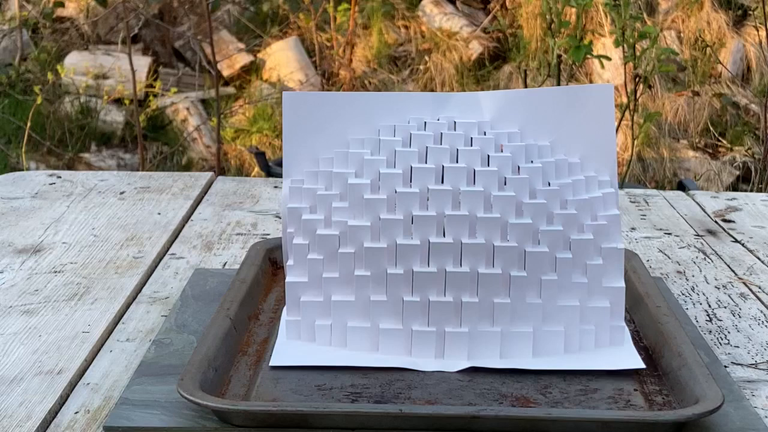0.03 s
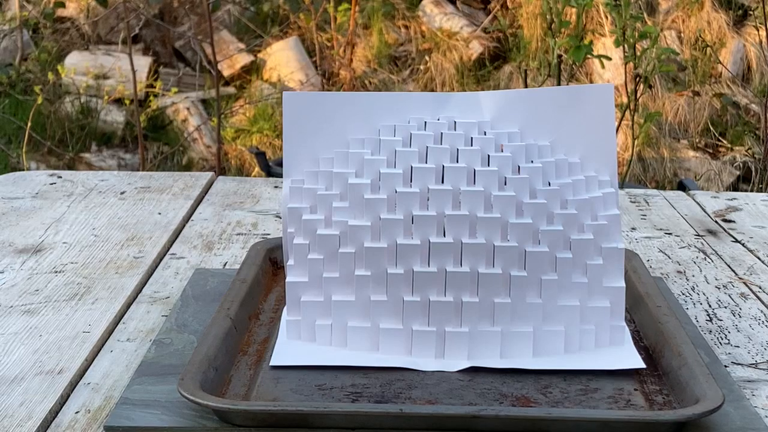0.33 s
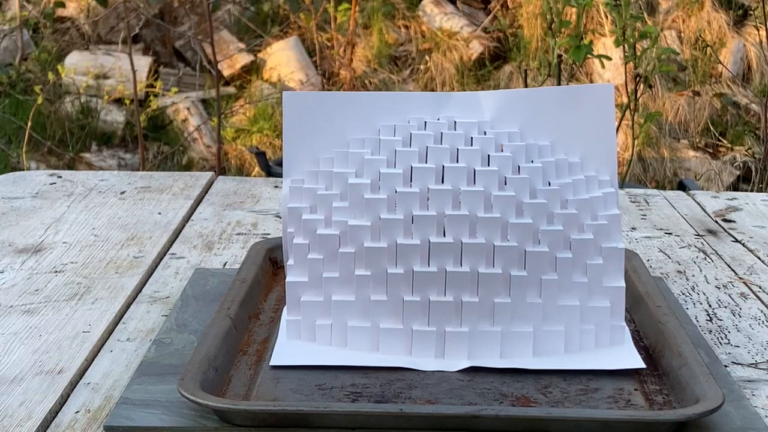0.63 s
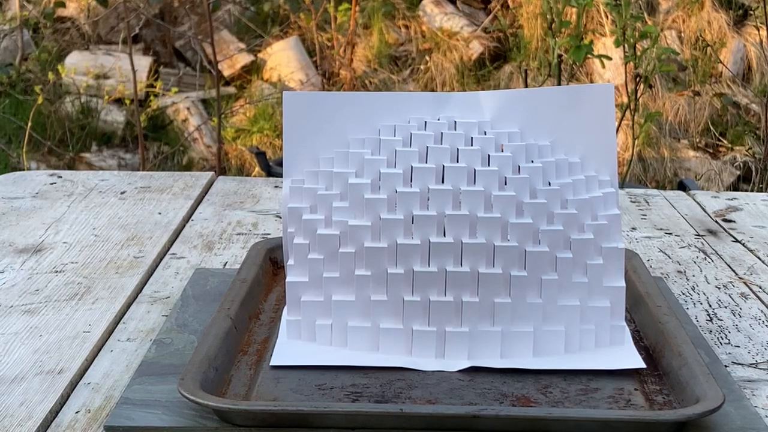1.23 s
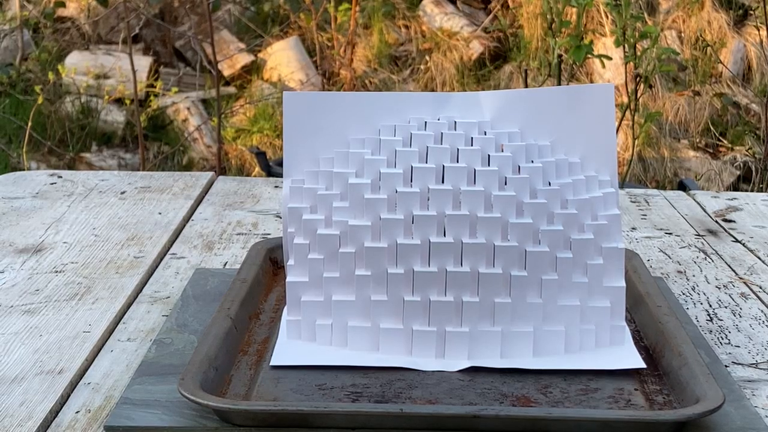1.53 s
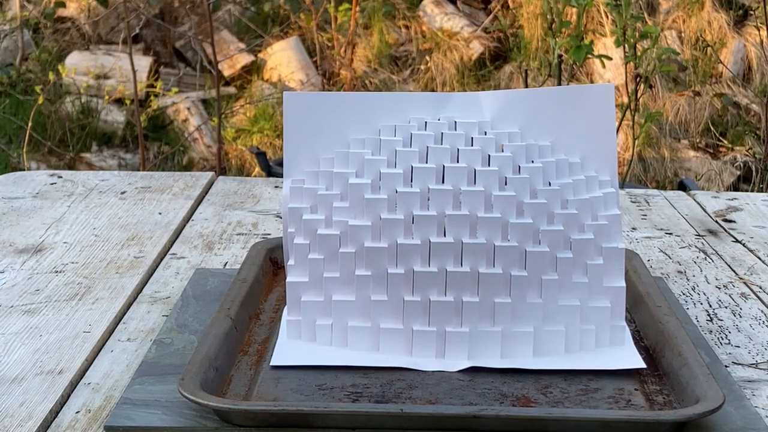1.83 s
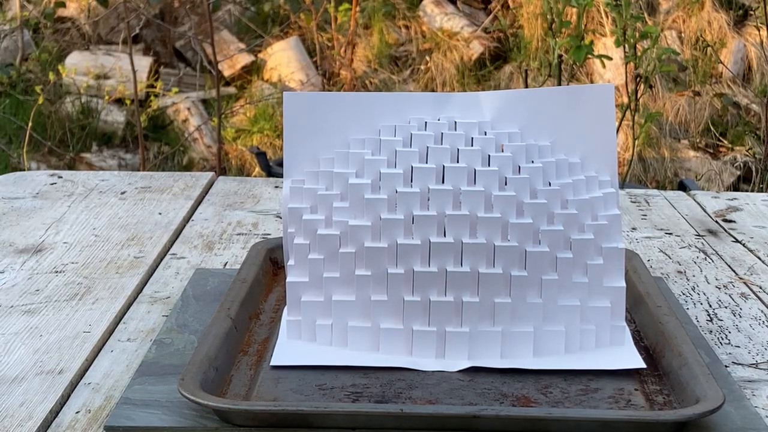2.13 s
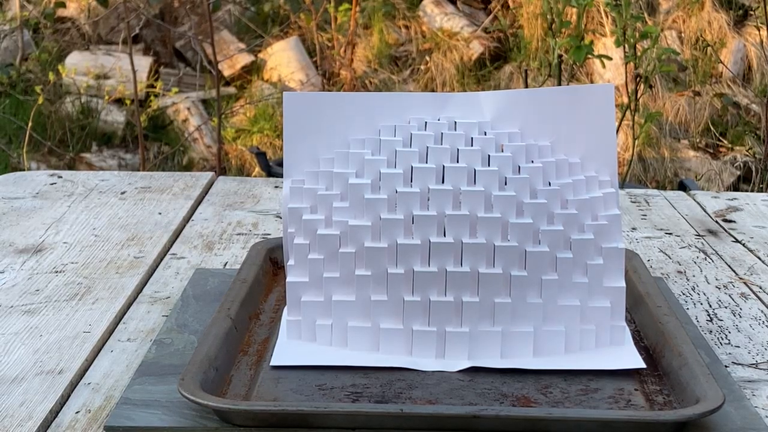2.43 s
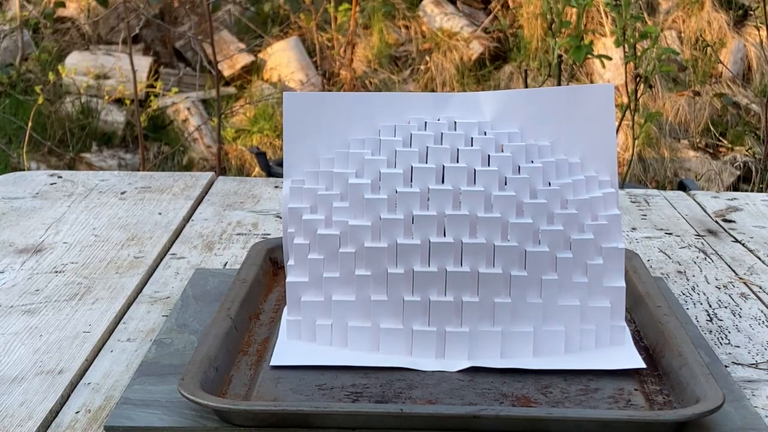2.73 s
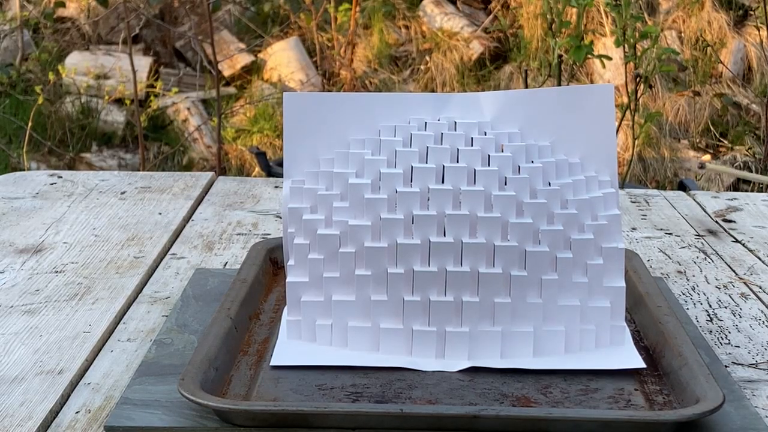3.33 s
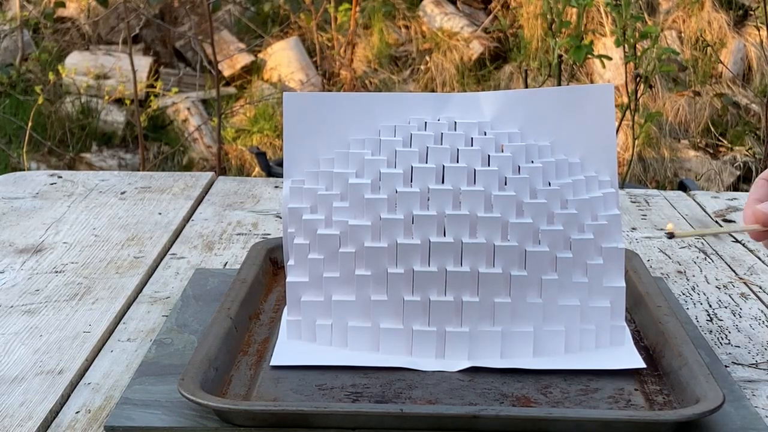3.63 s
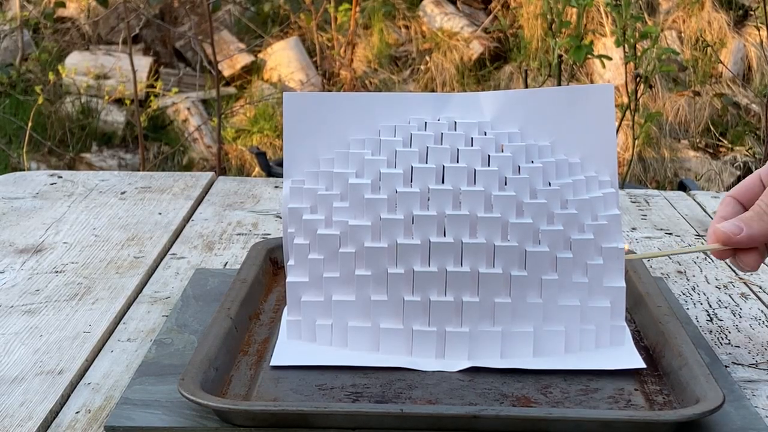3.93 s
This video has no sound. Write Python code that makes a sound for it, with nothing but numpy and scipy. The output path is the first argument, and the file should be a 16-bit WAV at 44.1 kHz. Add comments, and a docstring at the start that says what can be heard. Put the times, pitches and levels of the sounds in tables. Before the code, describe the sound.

A match is struck, then flares with a soft hiss, outdoors with faint birdsong.

```python
"""In a garden, a match is struck near a two-port microphone. Stick-slip friction of the head on the
strip shakes the hollow box; the head sputters, then flares with a soft hiss. Box and matchstick
tick, and the table takes two soft knocks. A small bird sings a long buzzy trill of rapid falling
whistles, others chirp far off, and a distant engine drones under the low rumble of the open air."""
import sys
import numpy as np
from scipy import signal
from scipy.fft import rfft, irfft
from scipy.io import wavfile
from scipy.ndimage import uniform_filter1d

SR = 44100
rng = np.random.default_rng(int(sys.argv[2]) if len(sys.argv) > 2 else 0)


def unload_audio(sound):
    """Save the sound as a 16-bit wav file, at the path given as the first command line argument."""
    columns = np.transpose(np.atleast_2d(sound))
    # keep every value between -1 and 1, then stretch to whole-number steps
    steps = np.round(np.clip(columns, -1, 1) * 32767)
    wavfile.write(sys.argv[1], SR, steps.astype(np.int16))


N = 176400
T, HZ = np.arange(N) / SR, np.fft.rfftfreq(N, 1 / SR)


def amp(db):
    """Decibels to amplitude ratio."""
    return 10 ** (np.asarray(db) / 20)

def unit(x):
    """Normalisation to rms 1."""
    return x / np.sqrt(np.mean(x ** 2) + 1e-20)

def read(points, hz=HZ):
    """Interpolation on a log-frequency axis."""
    f, value = np.transpose(points)
    return np.interp(np.log(hz + 1), np.log(f), value)

def level(points):
    """Amplitude envelope from a dB curve, silent outside it."""
    return amp(np.interp(T, *np.transpose(points), left=-200, right=-200))

def drift(hz):
    """Random modulation: low-passed noise of rms 1."""
    return unit(irfft(rfft(rng.standard_normal(N)) / (1 + (HZ / hz) ** 4), N))

def burst(start, fall, hold=0, rise=1 / SR):
    """Transient envelope: linear attack, hold and exponential decay."""
    return np.clip((T - start) / rise, 0, 1) * np.exp(-np.maximum(T - start - hold, 0) / fall)

def colour(x, points):
    """Minimum-phase filter of unit power gain: the table sets only the spectral shape."""
    gain = amp(read(points, abs(np.fft.fftfreq(4096, 1 / SR))))
    log_response = np.conj(signal.hilbert(np.log(gain)))
    taps = np.fft.ifft(np.exp(log_response)).real[:2048]
    return signal.oaconvolve(x, taps / np.linalg.norm(taps))[:N]

def grains(per_s, spread_db):
    """Shot noise: a dense crackle of tiny clicks of uneven size."""
    size = amp(spread_db * np.minimum(rng.exponential(1, N), 4))
    return unit(size * rng.choice([-1., 1.], N) * (rng.random(N) < per_s / SR))

def echoes(x, t60, delay):
    """Reverberation: sparse, decaying reflections, different on each side."""
    t = T[:SR // 2]
    taps = rng.standard_normal((2, len(t))) * (rng.random((2, len(t))) < .05)
    taps *= amp(-60 * t / t60) * (t > delay)
    taps /= np.linalg.norm(taps, axis=1, keepdims=True)
    return signal.oaconvolve(x[None], taps, axes=1)[:, :N]

def tabletop(x):
    """Early reflections from the table and tray add to the direct sound."""
    return x + amp(-14) * echoes(x, t60=.051, delay=.0026)

def ports(x, balance, lead):
    """Direction appears as a level and phase difference between the two microphone ports."""
    half = amp(read(balance) / 2) * np.exp(.5j * read(lead))
    return irfft(rfft(x) * np.array([half, 1 / half]), N)

def air():
    """Partially coherent noise: an outdoor rumble, alike on both sides in the bass."""
    # rumble spectrum (frequency [Hz], relative level [dB])
    spectrum = [(20, -44), (45, -2), (95, -7.5), (165, -12.5), (280, -21), (450, -24.5), (800, -22),
                (1100, -26), (1600, -38.5), (2500, -44), (4000, -62.5), (6500, -56.5), (10000, -58.5),
                (15500, -59)]
    # rumble envelope (time [s], level [dB])
    envelope = [(0, -49.5), (.7, -52.5), (1.5, -50.5), (2.4, -49), (2.9, -50), (3.2, -48), (4, -49)]
    # likeness of left and right (frequency [Hz], correlation [1])
    coherence = [(50, 0.87), (130, 0.77), (340, 0.35), (700, 0.67), (1200, 0.45), (2500, 0.048),
                 (5000, 0.53), (7500, 0.67), (15000, 1)]
    patches = rng.standard_normal((N // 256 + 5, 513))  # level ripple over time and frequency
    patches = unit(uniform_filter1d(uniform_filter1d(patches, size=14, axis=0), size=12, axis=1))
    frames = rng.standard_normal((2, *patches.shape)) + 1j * rng.standard_normal((2, *patches.shape))
    frames = (frames * amp(.8 * patches)).transpose(0, 2, 1)
    left, other = rfft(signal.istft(frames, nperseg=1024, noverlap=768)[1][:, :N])
    same = np.clip(read(coherence), -1, 1)
    right = same * left + np.sqrt(1 - same ** 2) * other
    return unit(irfft(np.array([left, right]) * amp(read(spectrum)), N)) * level(envelope)

def engine():
    """A far engine radiates a fundamental and its orders, which waver in propagation."""
    # envelope of the fundamental (time [s], level [dB])
    envelope = [(.1, -51), (.27, -45), (.6, -52), (1.0, -45.5), (1.2, -42.5), (1.3, -50.5), (1.55, -41.5),
                (1.85, -44), (2.2, -39), (2.3, -41.5), (2.53, -37.5), (2.63, -41.5), (2.74, -38),
                (2.94, -48.5), (3.1, -38.5), (3.4, -39), (3.7, -39.5), (4, -43.5)]
    # upper orders (frequency ratio [1], start level [dB], end level [dB])
    orders = [(2, -66, -51.5), (3, -66.5, -57), (3.55, -93.5, -64.5), (4, -84, -80.5), (4.72, -82, -71.5)]
    fundamental_hz, wow_hz, waver = 65.9, .74, .17
    phase = 2 * np.pi * np.cumsum(fundamental_hz + wow_hz * drift(hz=3)) / SR
    in_phase = (1 + waver * drift(hz=22)) * np.sin(phase)
    quadrature = waver * drift(hz=26) * np.cos(phase)
    drone = level(envelope) * (in_phase + quadrature)
    for ratio, first_db, last_db in orders:
        swell = amp(first_db + (last_db - first_db) * T / T[-1])
        drone += swell * (1 + .31 * drift(hz=4.8)) * np.sin(ratio * phase)
    return np.sqrt(2) * drone

def chorus():
    """Incoherent summation blurs many far birds to a whisper of band noise."""
    # chorus envelope (time [s], level [dB])
    envelope = [(0, -70), (.2, -92.5), (.29, -74), (.45, -84), (.68, -83.5), (.8, -93), (2.2, -62.5),
                (2.3, -69), (2.6, -70), (2.85, -94.5), (3.15, -80), (3.42, -82.5), (3.6, -80),
                (3.69, -95.5), (3.83, -79.5), (4, -91)]
    # chorus spectrum (frequency [Hz], relative level [dB])
    spectrum = [(2000, -26), (3400, 6.5), (4300, 9), (5100, 8), (6200, -10), (9000, -59.5)]
    whisper = np.array([colour(side, spectrum) for side in rng.standard_normal((2, N))])
    return whisper * level(envelope) * amp(1.5 * drift(hz=25))

def chirps():
    """Gliding whistles, as sung and as they arrive directly: distance weakens the direct path."""
    # bird notes (time [s], length [s], start pitch [Hz], end pitch [Hz], level [dB])
    notes = [(.395, 0.027, 4100, 4700, -76), (0.485, 0.26, 3850, 3860, -78),
             (0.669, 0.05, 3430, 2880, -73.5), (0.705, 0.021, 3810, 4730, -67.5),
             (0.853, 0.068, 3650, 3350, -80), (.905, 0.053, 3150, 2810, -77), (1.058, .05, 3510, 3200, -76),
             (1.278, 0.056, 3690, 3430, -71.5), (1.227, 0.034, 5550, 6960, -79),
             (1.264, 0.031, 7300, 5500, -63.5), (1.357, 0.044, 5080, 6100, -71.5),
             (1.4, 0.035, 7340, 6100, -73), (1.431, 0.021, 5870, 3720, -57),
             (1.436, 0.041, 3280, 2370, -71), (1.665, 0.051, 3500, 2950, -61),
             (2.127, 0.033, 3260, 2940, -69), (2.437, 0.023, 3980, 3590, -57.5),
             (2.465, .017, 3860, 3530, -60), (2.515, 0.015, 4100, 3540, -62),
             (2.538, 0.017, 3820, 3530, -60.5), (2.618, 0.017, 3410, 3000, -64),
             (2.703, 0.024, 3390, 3035, -64.5), (2.758, 0.054, 3770, 3550, -69),
             (2.783, 0.028, 3340, 3020, -67), (2.848, 0.062, 3736, 3540, -69.5),
             (2.866, 0.026, 3340, 3070, -66)]
    sung, direct, waver = np.zeros(N), np.zeros(N), drift(hz=401)
    for start, length, from_hz, to_hz, db in notes:
        far = (from_hz + to_hz) / 2 < 4150  # the low notes belong to a farther bird
        roughness, path_db = (.028, -4.5) if far else (.022, 0)
        at = (T >= start) & (T < start + length)
        progress = (T[at] - start) / length
        hz = from_hz * (to_hz / from_hz) ** progress * (1 + roughness * waver[at])
        note = amp(db) * np.sqrt(2) * np.sin(np.pi * progress) * np.sin(2 * np.pi * np.cumsum(hz) / SR)
        sung[at] += note
        direct[at] += amp(path_db) * note
    return sung, direct

def trill():
    """Source and filter: quick falling whistles fuse into a buzz, shaped by the bird's throat."""
    # trill envelope (time [s], level [dB])
    envelope = [(1.455, -70), (1.5, -64.5), (1.65, -58), (1.87, -56), (2.0, -58.5), (2.12, -60),
                (2.21, -64.5), (2.3, -77)]
    # repetition of the sweeps (time [s], rate [1/s])
    rates = [(1.48, 154), (1.87, 159), (1.96, 150), (2.3, 134)]
    # starting pitch of the sweeps (time [s], frequency [Hz])
    tops = [(1.48, 5210), (1.62, 5510), (1.9, 5776), (2.28, 5650)]
    # passband of the throat (frequency [Hz], relative gain [dB])
    throat = [(3050, -25), (3700, 0), (4500, -1.5), (5400, 1), (5950, -28)]
    end_hz, duty, jitter = 3430, .62, .017
    rate = np.interp(T, *np.transpose(rates)) * (1 + jitter * drift(hz=51.7))
    cycle = np.cumsum(rate) / SR % 1
    sweep = np.minimum(cycle / duty, 1)
    top_hz = np.interp(T, *np.transpose(tops))
    hz = (top_hz + (end_hz - top_hz) * sweep) * (1 + .012 * drift(hz=200))
    whistles = np.sin(np.pi * sweep) * np.sin(2 * np.pi * np.cumsum(hz) / SR)
    return unit(colour(whistles, throat)) * level(envelope) * amp(drift(hz=62))

def birds():
    """Direct song and its reverberant field in the garden, over the far chorus."""
    buzz = trill()
    sung, direct = chirps()
    garden = echoes(amp(-5.5) * buzz + amp(-6) * sung, t60=.2, delay=.004)
    return buzz + direct + garden + chorus()

def handling():
    """Impact and friction: matchstick and box tick, the box slides, knocks ring a damped table mode."""
    # small impacts (time [s], wood level [dB], snap level [dB], decay [s])
    ticks = [(0.1303, -84, -65.5, 0.0046), (0.465, -78, -57, 0.0017), (1.0514, -47.5, -74, 0.002),
             (1.13, -56, -54, 0.0051), (1.1333, -51, -51, 0.0053), (1.1634, -57, -63.5, 0.0052),
             (1.4103, -57.5, -59, 0.0098), (1.951, -53, -56, .003), (3.0233, -55, -63, 0.0024),
             (3.2375, -62.5, -83, 0.0027), (3.295, -61, -56.5, 0.0028), (3.6168, -67, -81, 0.002),
             (3.758, -72, -71, .003), (3.7756, -60, -73, .004), (3.815, -71, -73, .003)]
    # woody part of a tick (frequency [Hz], relative level [dB])
    wood_spectrum = [(300, -10), (1000, 8), (1700, 3), (2300, 7.5), (3200, -8.5), (4500, -7), (6000, -22),
                     (9000, -10.5), (15500, -44)]
    # bright part of a tick (frequency [Hz], relative level [dB])
    snap_spectrum = [(2000, -25), (4500, -11), (6500, 1), (8000, 0.5), (11500, -5.5), (15500, -1.5)]
    # the box sliding in the fingers (time [s], level [dB])
    slide_envelope = [(.55, -85), (.635, -66), (.665, -70.5), (.72, -82)]
    # sliding friction (frequency [Hz], relative level [dB])
    slide_spectrum = [(2000, 3), (5000, -16), (8000, 5.5), (12000, -0.5), (15500, -0.5)]
    # soft knocks on the table (time [s], level [dB])
    blows = [(0.095, -39.5), (0.267, -39)]
    wood = rng.standard_normal(N) * sum(amp(db) * burst(s, fall) for s, db, _, fall in ticks)
    snap = rng.standard_normal(N) * sum(amp(db) * burst(s, fall) for s, _, db, fall in ticks)
    slide = colour(grains(per_s=11000, spread_db=3) * level(slide_envelope), slide_spectrum)
    mode_hz, t60_s = 253.3, .12
    knocks = np.zeros(N)
    for start, db in blows:
        envelope = amp(db) * burst(start, fall=t60_s / np.log(1000), rise=.011)
        knocks += envelope * np.sin(2 * np.pi * mode_hz * (T - start))
    return colour(wood, wood_spectrum) + colour(snap, snap_spectrum) + slide + knocks

def flame():
    """Combustion noise: the head sputters, hisses and spits; a close reflection comb-filters the flare."""
    # the head catching (time [s], level [dB])
    catching = [(1.75, -43), (1.774, -44.5), (1.785, -51.5), (1.805, -46.5), (1.822, -44), (1.836, -42.5),
                (1.852, -52), (1.88, -61.5), (1.91, -71)]
    # its sputter (frequency [Hz], relative level [dB])
    sputter_spectrum = [(300, -5), (750, -11.5), (1300, 5), (2500, -0.5), (4000, -9.5), (6400, -7),
                        (8300, -9.5), (11500, -13.5), (15500, -20)]
    # the head flaring (time [s], level [dB])
    flaring = [(1.83, -66.5), (1.91, -65), (1.945, -60.5), (1.982, -51), (2.04, -62), (2.16, -63),
               (2.25, -60.5), (2.43, -58), (2.52, -60), (2.555, -58.5), (2.595, -58.5), (2.61, -63.5),
               (2.73, -64)]
    # its hiss (frequency [Hz], relative level [dB])
    flare_spectrum = [(500, -3.5), (1500, 2), (2500, -5.5), (4000, -2.5), (5200, -9), (8000, 0), (9800, 2),
                      (11500, 2), (13000, 0.5), (15500, 1)]
    # spits of the flame (time [s], level [dB])
    spitting = [(1.8142, -37.5), (1.9515, -57), (2.5794, -59), (2.7285, -52.5)]
    flutter_db, reflection_db, reflection_s = 1.3, -8, .00051
    sputter = colour(grains(per_s=9000, spread_db=3.5) * level(catching), sputter_spectrum)
    burn = level(flaring) + amp(-71) * burst(flaring[-1][0], fall=.022)  # the hiss stops short
    hiss = grains(per_s=21000, spread_db=4) * burn * amp(flutter_db * drift(hz=119))
    spits = rng.standard_normal(N) * sum(amp(db) * burst(s, fall=.00159) for s, db in spitting)
    flare = colour(hiss + spits, flare_spectrum)
    return sputter + flare + amp(reflection_db) * np.roll(flare, round(reflection_s * SR))

def strike():
    """Stick-slip friction: the head skids over the grit, and each slip excites the modes of the box."""
    # slips of the head (time [s], length [s], grit level [dB], box level [dB])
    slips = [(1.7080, 0.0016, -28.5, -56), (1.7161, 0.0042, -24.5, -34), (1.727, 0.0034, -30.5, -40),
             (1.7309, 0.0066, -27, -27.5), (1.7415, .002, -28, -47), (1.744, .0009, -24, -33),
             (1.7477, 0.0018, -29.5, -30.5), (1.769, .006, -55.5, -46.5)]
    # rubbing under the slips (time [s], level [dB])
    rubbing = [(1.69, -64.5), (1.706, -46.5), (1.724, -40.5), (1.745, -37), (1.757, -53.5), (1.773, -54),
               (1.79, -69.5)]
    # scrape of the grit (frequency [Hz], relative level [dB])
    grit_spectrum = [(200, -18), (450, -26.5), (1100, 0), (1700, -2.5), (2500, 0), (3600, -4.5),
                     (5300, 1.5), (6800, -6), (8400, 2), (9600, 2), (10600, -8), (13000, -3), (15500, -6)]
    # modes of the hollow box (frequency [Hz], bandwidth [Hz], relative level [dB])
    modes = [(260, 120, -19), (595, 26, -7.5), (750, 50, -3.5), (834, 54, -2.5), (1094, 30, -1),
             (1445, 22, 2.5), (1650, 35, 2), (1780, 35, 0), (2096, 40, -2), (2355, 30, 0), (2660, 30, 0),
             (3603, 28, 0.5)]
    grit, push = level(rubbing), np.zeros(N)
    for start, length, grit_db, box_db in slips:
        slip = burst(start, fall=.0007, hold=length, rise=.0005)
        grit += amp(grit_db) * slip
        push += amp(box_db) * slip
    crackle = grains(per_s=18000, spread_db=2.5)
    t = T[:SR // 10]
    ring = sum(amp(db) * width * np.exp(-np.pi * width * t) * np.sin(2 * np.pi * hz * t)
               for hz, width, db in modes)
    box = signal.oaconvolve(crackle * push, ring / np.linalg.norm(ring))[:N]
    return colour(crackle * grit, grit_spectrum) + box

def scene():
    """Superposition at the two ports: the match close by; birds, engine and air far off."""
    # near sources, left minus right (frequency [Hz], level difference [dB])
    near_balance = [(200, -2), (400, 4.5), (700, -18.5), (1300, -4.5), (2400, -1.5), (8000, 0.3),
                    (15000, 0)]
    # far sources, left minus right (frequency [Hz], level difference [dB])
    far_balance = [(60, 3), (150, 2.5), (340, 0.5), (700, -2.5), (1200, -1), (3000, -1), (8000, -0.5)]
    # lead of the left port for the strike (frequency [Hz], phase [rad])
    strike_lead = [(20, .05), (130, .17), (350, -.35), (700, -2), (1120, -2), (1700, -3.2), (2400, -4.2),
                   (3000, -5.9), (4000, -6.7), (5300, -9.2), (6100, -10.8), (6700, -10.4), (7100, -7.6),
                   (8000, -6.28), (9700, -3.14), (11400, 0), (13100, 3.14), (14800, 6.28), (16000, 8.3)]
    # its lead for the birds (frequency [Hz], phase [rad])
    bird_lead = [(2000, 0.53), (5000, 1.72), (8000, 1.3)]
    # its lead for all other sources (frequency [Hz], phase [rad])
    lead = [(20, .05), (66, .19), (130, .17), (350, -.35), (700, -2.3), (1500, -3.0), (2400, -4.4),
            (3000, -5.7), (4600, -6.9), (5400, -8), (5900, -9.3), (6800, -9.3), (8000, -6.28),
            (9700, -3.14), (11400, 0), (13100, 3.14), (14800, 6.28), (16000, 8.3)]
    scrape = ports(tabletop(strike()), near_balance, strike_lead)
    flame_and_hands = ports(tabletop(flame() + handling()), near_balance, lead)
    song = ports(birds(), far_balance, bird_lead)
    background = ports(engine() + air(), far_balance, lead)
    return scrape + flame_and_hands + song + background

def record(dry):
    """Gating and band limiting: the microphone opens after a moment of silence and cuts the top treble."""
    open_s, cutoff_hz = .084, 15850
    gate = np.clip((T - open_s) / .002, 0, 1)
    taps = signal.firwin(511, cutoff_hz, window=("kaiser", 9), fs=SR)
    return signal.oaconvolve(dry * gate, taps[None], "same")


dry = scene()
out = record(dry)
unload_audio(out)
```